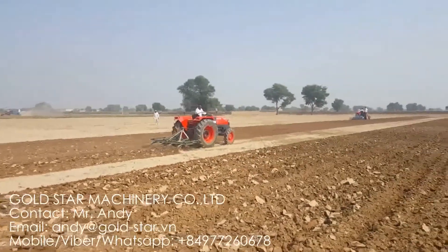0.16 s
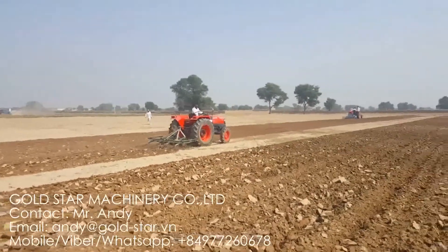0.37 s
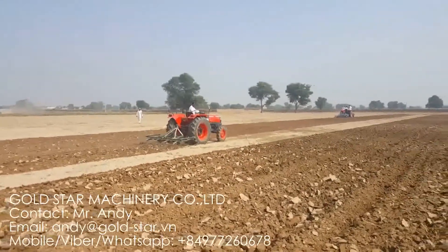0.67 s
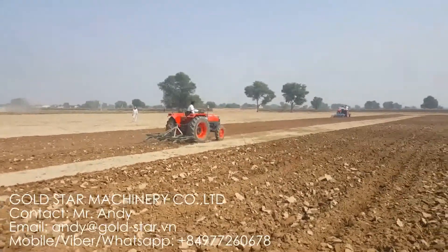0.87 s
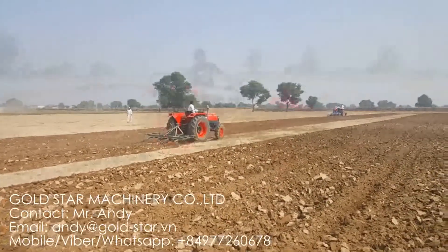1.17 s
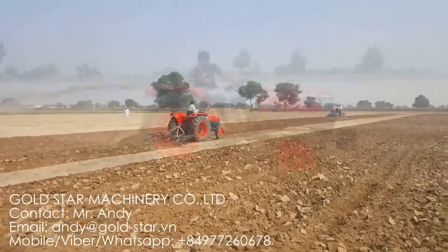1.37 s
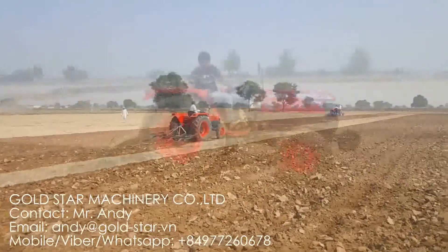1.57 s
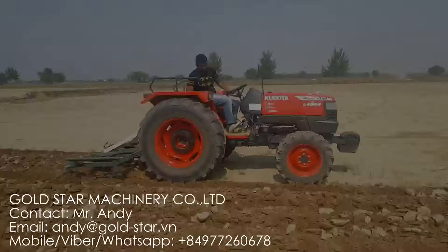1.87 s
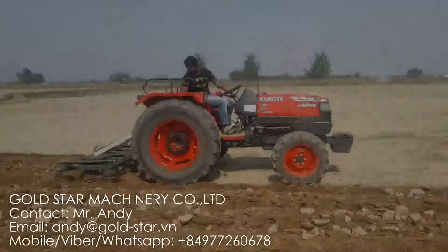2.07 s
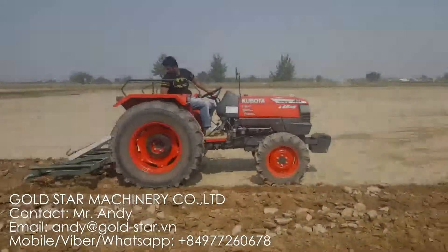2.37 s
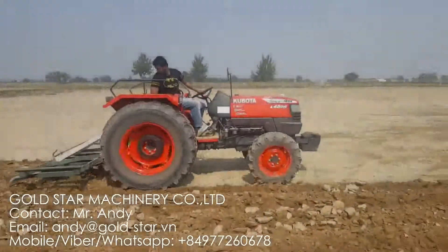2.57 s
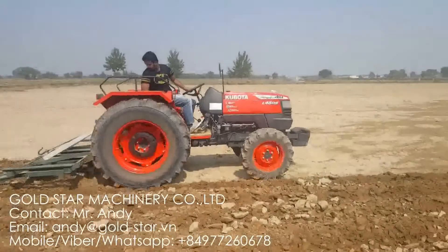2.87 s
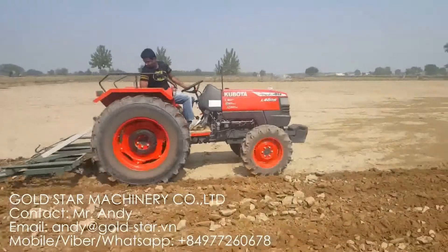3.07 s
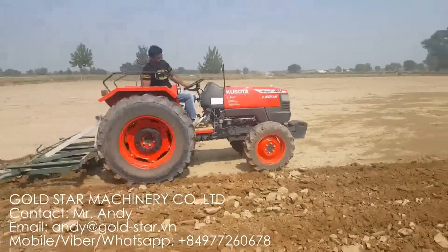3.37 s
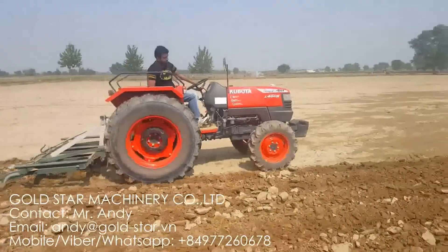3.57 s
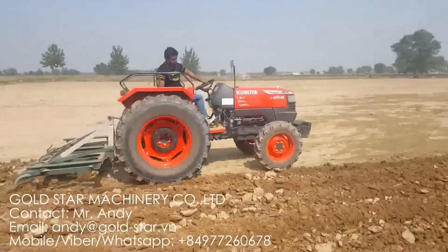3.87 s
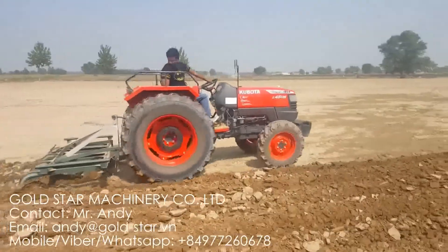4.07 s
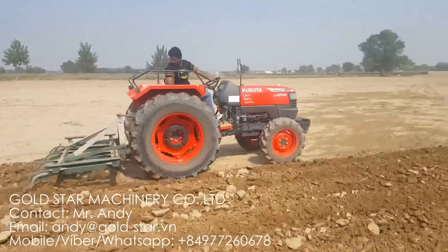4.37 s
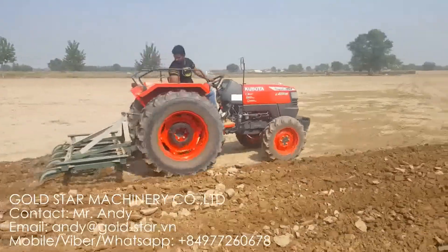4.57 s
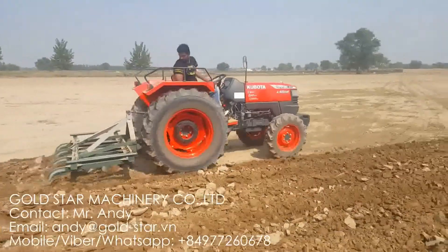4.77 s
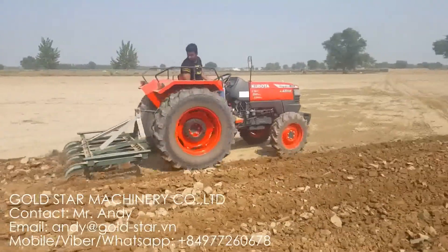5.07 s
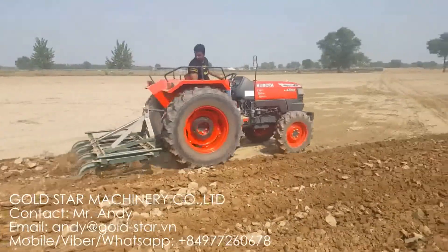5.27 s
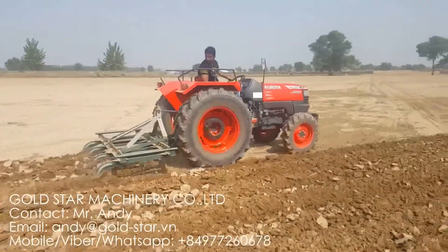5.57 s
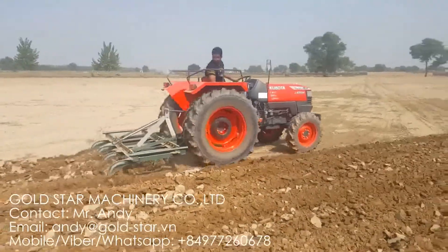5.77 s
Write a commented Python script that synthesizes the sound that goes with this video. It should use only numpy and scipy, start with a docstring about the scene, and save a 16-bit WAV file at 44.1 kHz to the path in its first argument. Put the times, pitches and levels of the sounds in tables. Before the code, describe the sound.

Steady diesel tractor engine outdoors, dull and far at first, suddenly close with booming exhaust, mechanical clatter and thin gear whine under load.

```python
"""A four-cylinder diesel tractor drags a cultivator over a dry field, heard close by after a far-off opening.
The close view cuts in abruptly over the far view, which holds on for about a second, then drops out;
while both sound, their exhaust notes beat. Exhaust orders and whines are sines locked to the firing rate;
uneven cylinders are pulses through a silencer. Roar is patchy noise that jumps at each firing,
and clatter is a train of blows ringing the engine block."""
import sys
import numpy as np
from scipy import signal
from scipy.fft import rfft, irfft, next_fast_len
from scipy.io import wavfile
from scipy.ndimage import uniform_filter1d, map_coordinates

SR = 44100
rng = np.random.default_rng(int(sys.argv[2]) if len(sys.argv) > 2 else 0)


def inscribe(sig):
    """Save sig as 16-bit PCM at rate SR to the path in sys.argv[1].

    A 1-D sig is mono; a 2-D sig holds one channel per row.
    Samples are clipped to [-1, 1] before scaling.
    """
    pcm = np.round(np.clip(np.atleast_2d(sig).T, -1, 1) * 32767)
    wavfile.write(sys.argv[1], SR, pcm.astype(np.int16))


N = 261072


def amp(db):
    """Decibels to linear gain."""
    return 10 ** (np.asarray(db) / 20)


def unit(x):
    """Scale to rms 1."""
    return x / np.sqrt(np.mean(x ** 2) + 1e-20)


def curves(rows):
    """One value per sample for each column after the time."""
    s, *cols = np.transpose(rows)
    return [np.interp(np.arange(N) / SR, s, c) for c in cols]


def ramp(start_s, end_s):
    """0 before the start, 1 after the end, straight between."""
    return np.clip((np.arange(N) / SR - start_s) / (end_s - start_s), 0, 1)


def wobble(rate):
    """A smooth random curve through rate knots a second."""
    knots = rng.standard_normal(int(N * rate / SR) + 4)
    return map_coordinates(knots, [np.arange(N) * rate / SR])


def coloured(x, spectrum):
    """Filter x through (Hz, dB) points read on a log frequency axis, at rms 1."""
    m = next_fast_len(N + 8192)
    f, db = np.transpose(spectrum)
    bins = np.fft.rfftfreq(m, 1 / SR)
    gain = amp(np.interp(np.log(bins + 1), np.log(f + 1), db))
    return unit(irfft(rfft(x, m) * gain, m)[:N])


def patchy(depth_db):
    """White noise with smooth patches of random gain in time and frequency."""
    z = signal.stft(rng.standard_normal(N + 512), nperseg=512)[2]
    across_frequency = uniform_filter1d(rng.standard_normal(z.shape), 5, 0)
    field = uniform_filter1d(across_frequency, 12, 1)
    return signal.istft(z * amp(depth_db * unit(field)), nperseg=512)[1][:N]


def sine(turns, db):
    """A sine at one cycle a turn, its rms given in dB."""
    return np.sqrt(2) * amp(db) * np.cos(2 * np.pi * turns)


def tone(turns, order, db, waver_db, blur):
    """A sine locked to a multiple of the firing rate, wavering in level and, by blur radians, in phase."""
    phase_turns = order * turns + rng.random() + blur * wobble(12) / (2 * np.pi)
    return sine(phase_turns, db + waver_db * wobble(9))


def knock(turns, depth, fall):
    """Gain that jumps at each firing and falls until the next; knocks come unevenly in size and moment."""
    size = amp(3 * rng.standard_normal(int(turns[-1]) + 2))
    loose = np.maximum(turns + 0.15 * wobble(40), 0)
    since_firing = loose % 1
    return unit(1 + depth * size[loose.astype(int)] * np.exp(-fall * since_firing))


# Uneven firings heard through the silencer. Each row: frequency in Hz, relative level in dB.
SILENCER = [(60, -42), (85, -10.5), (107, 10.5), (140, 8), (170, -3.5), (200, 12.5), (240, -1), (300, 6.5),
            (450, -9.5), (700, 0), (900, -10), (1500, -13.5), (2500, -49)]
# How much harder or softer than the mean each cylinder fires. One relative strength per cylinder.
CYLINDER_STRENGTH = [0.91, 0.76, -0.74, -0.42]


def uneven(turns, scatter):
    """One pulse per firing, sized by how far its cylinder strays from the mean, through the silencer."""
    fired = np.flatnonzero(np.diff(np.floor(turns)))
    strength = np.resize(CYLINDER_STRENGTH, len(fired))
    pulses = np.zeros(N)
    pulses[fired] = strength + scatter * rng.standard_normal(len(fired))
    return coloured(pulses, SILENCER)


# Far engine speed. Each row: time in seconds, firing rate in Hz.
FAR_FIRING_RATE = [(0, 67.38), (.48, 67.5), (.72, 67.3), (.84, 67.05), (1.08, 67.3), (1.4, 67.1),
                   (1.7, 66.95), (2.1, 67.1)]
# Far engine mix. Each row: time in seconds, first order in dB, second order in dB, roar in dB.
FAR_LEVELS = [(0, -27, -27.5, -27), (.24, -24, -25.5, -27), (.48, -25, -28, -27.5), (.72, -24, -27.5, -27),
              (.84, -29, -28, -27.5), (1.08, -26, -28, -25.5), (1.7, -23.5, -21.5, -30.5),
              (1.9, -26, -40, -38), (2.05, -52, -49, -65), (2.15, -96, -99, -98)]
# Steady thin tones of the far engine. Each value: multiple of the firing rate.
FAR_TONE_ORDERS = [1.42, 1.67, 3, 6.04, 7.75, 9.79, 10.25, 11.25, 12, 14.79, 19, 22.12, 23.25, 29.54, 30.96,
                   36.92, 39.1, 44.42, 46.46, 48.9, 54.2, 131.8]
# Level of each far tone, in the same order. Each value: mean level in dB relative to the far roar.
FAR_TONE_LEVELS = [-9.5, -13, -13.5, -15.5, -23.5, -14, -19.5, -15, -15, -15.5, -18.5, -24, -21, -16, -18,
                   -20.5, -26, -16.5, -23, -23.5, -27.5, -45]
# Colour of the far roar, with the dips of the ground echo. Each row: frequency in Hz, relative level in dB per Hz.
FAR_ROAR_COLOUR = [(30, -29), (60, -15.5), (110, -11), (190, -13.5), (290, -28.5), (420, -14.5), (520, -11),
                   (620, -27), (760, -17), (1250, -16.5), (1390, -23), (1560, -14), (1780, -24.5),
                   (2000, -17.5), (2300, -23), (3000, -22.5), (4500, -34.5), (6000, -38.5), (7800, -42),
                   (10300, -64.5), (13400, -101)]


def far_tractor():
    """The same engine at a distance, running faster: two clear orders, thin tones, dull roar."""
    first_db, second_db, roar_db = curves(FAR_LEVELS)
    turns = np.cumsum(curves(FAR_FIRING_RATE)[0]) / SR - .09
    beat = sine(turns, first_db) + sine(2 * turns + 1.7 / (2 * np.pi), second_db)
    tones = sum(tone(turns, order, db, waver_db=3.0, blur=0.43)
                for order, db in zip(FAR_TONE_ORDERS, FAR_TONE_LEVELS))
    roar = coloured(patchy(0.92) * knock(turns, depth=0.13, fall=3), FAR_ROAR_COLOUR)
    lope = amp(-10.5) * uneven(turns, scatter=0.34)
    return beat + amp(roar_db) * (roar + tones + lope)


# Fainter steady tones of the close engine. Each value: multiple of the firing rate.
FAINT_ORDERS = [1.15, 2.3, 7, 8, 11, 13, 15.5, 19.6, 24.02, 25.25, 29.35, 38.75, 39.15, 48.95, 78.35]
# Mean level of each faint tone, in the same order.
# Each row: level as the close view opens in dB, level at the end in dB.
FAINT_LEVELS = [(-38.5, -36), (-38, -36.5), (-45, -43), (-40, -50.5), (-53, -35), (-47, -49), (-39, -39),
                (-39, -44.5), (-32, -43.5), (-37, -39.5), (-37, -42), (-41, -48), (-41, -49), (-40.5, -45),
                (-47.5, -61)]


def faint_tones(turns, along):
    """Thin engine-locked sines, each sliding from its opening level to its closing one."""
    total = np.zeros(N)
    for order, (opening, closing) in zip(FAINT_ORDERS, FAINT_LEVELS):
        db = opening + (closing - opening) * along + 1.5 * wobble(1.6)
        # higher tones blur more
        total += tone(turns, order, db, waver_db=2.0, blur=.5 + order / 40)
    return total


# Engine block and tinware resonances. Each row: centre in Hz, width in Hz, relative peak level in dB.
BLOCK_MODES = [(619, 63, 4), (740, 86, -0.5), (875, 78, -2), (1425, 95, 3), (1866, 180, -4), (2310, 85, -4),
               (3100, 153, -8), (3590, 170, -8), (4660, 300, -20), (7700, 690, -25)]


def clatter(turns, per_firing, spread_db):
    """Valve, injector and combustion blows, bunched just after each firing, ring the block."""
    # six chances of a blow per firing
    draws = rng.random((int(turns[-1]) * 6, 4))
    when = np.arange(len(draws)) // 6 + draws[:, 0] ** 1.6
    struck = draws[:, 1] < per_firing / 6
    size = struck * amp(-spread_db * np.log(draws[:, 2] + 1e-3)) * np.sign(draws[:, 3] - .5)
    blows = np.bincount(np.searchsorted(turns, when), size, N + 1)[:N]
    m = next_fast_len(N + 8192)
    f = np.fft.rfftfreq(m, 1 / SR)
    ring = 0
    for k, (centre, width, db) in enumerate(BLOCK_MODES):
        # neighbouring modes ring in opposite polarity
        damping = 1j * f * width
        ring = ring + (-1) ** k * amp(db) * damping / (centre ** 2 - f ** 2 + damping)
    return unit(irfft(rfft(blows, m) * ring, m)[:N])


# Roar of fan, intake and block while close by. Each row: frequency in Hz, relative level in dB per Hz.
BODY_NEAR_COLOUR = [(30, -28), (50, -25), (85, -12), (150, -6), (250, -13), (420, -20.5), (600, -19.5),
                    (800, -14.5), (1100, -25.5), (1390, -15.5), (1620, -22.5), (1850, -18.5), (2100, -23),
                    (3000, -28), (4500, -38), (5850, -76), (9900, -120)]
# The same roar drawing away. Each row: frequency in Hz, relative level in dB per Hz.
BODY_AWAY_COLOUR = [(30, -33), (50, -18.5), (85, -10), (150, -11), (250, -10.5), (400, -17.5), (600, -20),
                    (900, -17.5), (1080, -29), (1420, -18.5), (1650, -23.5), (1900, -23), (2150, -27.5),
                    (3000, -29.5), (4500, -37), (5850, -62), (9900, -120)]
# Colour of the treble layer of the roar. Each row: frequency in Hz, relative level in dB per Hz.
TOP_COLOUR = [(1470, -21), (2500, -2), (2900, -5), (3650, -3.5), (4900, -4.5), (5750, -10.5), (7460, -12.5),
              (9340, -26), (10300, -54.5), (13400, -72), (22000, -120)]


def roar(turns, body_db, top_db):
    """Fan, intake and block noise pulsed by the firings; ground echo shifts its dips as the tractor draws away."""
    later = ramp(2.62, 4.04)
    early, late = (coloured(patchy(0.99) * knock(turns, depth=0.37, fall=2.7), colour)
                   for colour in (BODY_NEAR_COLOUR, BODY_AWAY_COLOUR))
    body = amp(body_db) * (np.sqrt(1 - later) * early + np.sqrt(later) * late)
    treble = coloured(patchy(0.81) * knock(turns, depth=0.5, fall=4.5), TOP_COLOUR)
    return body + amp(top_db + 0.16 * wobble(10)) * treble


def swelling(rest_db, swells):
    """A level that rests low and rises for each swell, with 48 ms edges."""
    edge_s = 0.048
    level = rest_db
    for start_s, end_s, db in swells:
        lift = ramp(start_s - edge_s, start_s) - ramp(end_s, end_s + edge_s)
        level = level + (db - rest_db) * lift
    return level


# Pump, high exhaust order, gear meshes and their overtones. Each value: multiple of the firing rate.
WHINE_MULTIPLES = [9.8, 12, 12.25, 14.8, 22.2, 23.25, 29.6, 31, 37, 44.4, 58.75, 74]
# Level of each whine between swells, in the same order. Each value: level in dB, before the jolting gain.
WHINE_REST = [-40.5, -37, -36, -33.5, -35.5, -42, -47, -48, -45, -43.5, -56, -56.5]
# Swells of each whine, one list per whine.
# Each row: start in seconds, end in seconds, level in dB before the jolting gain.
WHINE_SWELLS = [
    [(1.1, 2.0, -31), (2.55, 3.9, -27), (5.55, 5.9, -36.5)],
    [(1.45, 1.8, -29.5), (2.3, 2.75, -33), (3.45, 3.75, -28.5)],
    [(1.2, 2.5, -31.5), (3.75, 4.0, -33)],
    [(.96, 1.65, -29.5), (3.4, 4.9, -32), (5.25, 5.75, -30)],
    [(.96, 1.35, -24.5), (1.95, 2.75, -27), (3.3, 4.9, -30.5)],
    [(1.5, 2.15, -31.5), (3.3, 4.4, -32.5), (5.3, 5.85, -37)],
    [(2.05, 3.05, -33), (3.35, 3.9, -40), (5.3, 5.85, -38.5)],
    [(.96, 1.35, -34.5), (2.0, 2.5, -36.5), (3.2, 3.95, -33), (4.55, 5.2, -29), (5.5, 5.9, -36.5)],
    [(2.4, 2.6, -37), (3.85, 4.85, -37.5), (5.25, 5.5, -35.5)],
    [(1.5, 1.95, -43), (2.8, 3.2, -42), (4.05, 4.9, -39.5)],
    [(.96, 1.3, -43), (1.85, 2.55, -39), (3.35, 3.55, -41.5)],
    [(1.1, 1.247, -42.5)],
]


def whines(turns):
    """Engine-locked pump and gear tones, rising in swells; every firing jolts the gear train."""
    jolts = amp(0.5) * knock(turns, depth=0.47, fall=1.5)
    levels = map(swelling, WHINE_REST, WHINE_SWELLS)
    return jolts * sum(tone(turns, order, db, waver_db=1.55, blur=0.3)
                       for order, db in zip(WHINE_MULTIPLES, levels))


# Second order, booming as the load drags the engine down. Each row: time in seconds, level in dB.
BOOM_LEVEL = [(.96, -18), (1.4, -25), (2.2, -21.5), (3.1, -11.5), (3.7, -15), (5.2, -17.5), (5.92, -16.5)]
# Exhaust orders 3 to 6. Each row: level alongside in dB, level drawing away in dB.
UPPER_ORDER_LEVELS = [(-22, -30), (-26.5, -38.5), (-41.5, -35), (-40.5, -32.5)]
# Each exhaust order has its own lead; orders 2 to 4 slide over the close view.
# Each row: lead at first in turns, lead at the end in turns.
ORDER_LEADS = [(0, 0), (-.05, .11), (-.42, .42), (.02, .85), (.1, .1), (.4, .4)]


def exhaust_beat(turns, along):
    """Six low exhaust orders, each with its own lead, sum to the throb."""
    # the first order fades evenly; orders 3 to 6 change as the tractor turns its back
    first_db = -17 - 4 * along
    turned = ramp(3.24, 5.5)
    upper_db = [near + (away - near) * turned for near, away in UPPER_ORDER_LEVELS]
    levels = [first_db, *curves(BOOM_LEVEL), *upper_db]
    beat = np.zeros(N)
    for order, (db, (opening, closing)) in enumerate(zip(levels, ORDER_LEADS), start=1):
        lead = opening + (closing - opening) * along
        if order == 2:
            # extra lead in turns, lost before the boom builds
            lead = lead + 0.24 * (1 - ramp(1.6, 2.1))
        beat += sine(order * turns + lead, db + 0.12 * order ** 2 * wobble(4))
    return beat


CUT_IN_S = 0.956
# Close engine speed. Each row: time in seconds, firing rate in Hz.
CLOSE_FIRING_RATE = [(0.96, 61.75), (1.26, 61.56), (1.56, 61.99), (1.86, 61.52), (2.16, 61.12),
                     (2.46, 60.9), (2.76, 60.15), (3.06, 59.73), (3.36, 60.64), (3.66, 60.79),
                     (3.96, 61.77), (4.26, 62.16), (4.56, 62.3), (4.86, 62.44), (5.16, 62.32),
                     (5.46, 61.86), (5.76, 61.95), (5.92, 62.0)]
# Close roar mix. Each row: time in seconds, body level in dB, mean treble level in dB.
CLOSE_ROAR_LEVELS = [(.97, -20, -30), (1.3, -20, -31), (2.0, -18, -30.5), (2.86, -17.5, -29.5),
                     (3.23, -20.5, -30), (3.52, -18.5, -29.5), (4.09, -19.5, -30.5), (4.84, -19.5, -31),
                     (5.33, -20.5, -32.5), (5.92, -20, -33.5)]


def close_tractor():
    """Exhaust beat, whines, roar, loping cylinders and clatter, all driven by one firing rate."""
    turns = np.cumsum(curves(CLOSE_FIRING_RATE)[0]) / SR + .33
    along = ramp(CUT_IN_S, N / SR)
    body_db, top_db = curves(CLOSE_ROAR_LEVELS)
    tonal = exhaust_beat(turns, along) + whines(turns) + faint_tones(turns, along)
    lope = amp(body_db - 7.0 + 1.4 * wobble(2.76)) * uneven(turns + 0.3015, scatter=0.066)
    blows = amp(body_db - 8.0) * clatter(turns, per_firing=4.5, spread_db=2.0)
    # abrupt entry, under a millisecond long
    start = ramp(CUT_IN_S, CUT_IN_S + 0.00077)
    return start * (tonal + roar(turns, body_db, top_db) + lope + blows)


def scene():
    """The far engine and the close engine, summed to one channel."""
    return (far_tractor() + close_tractor())[None]


def record(dry):
    """Soft clipping near full scale, then nothing above the band limit."""
    band_limit_hz = 10450
    x = dry / (1 + np.abs(dry / .97) ** 8) ** (1 / 8)
    m = next_fast_len(N + 8192)
    passed = np.fft.rfftfreq(m, 1 / SR) < band_limit_hz
    return irfft(rfft(x, m) * passed, m)[:, :N]


dry = scene()
out = record(dry)
inscribe(out)
```